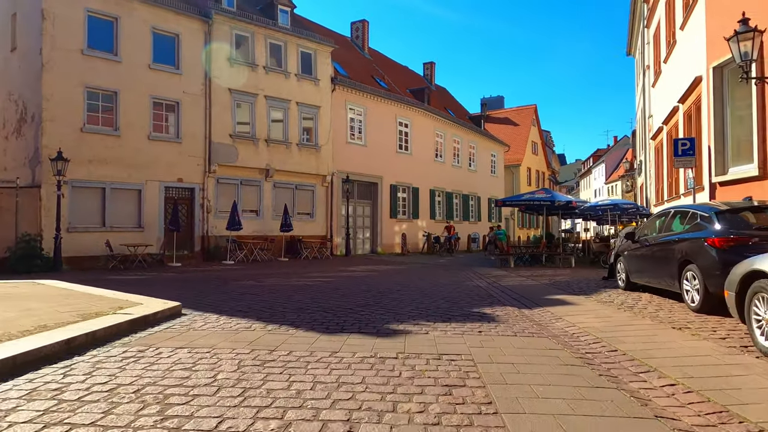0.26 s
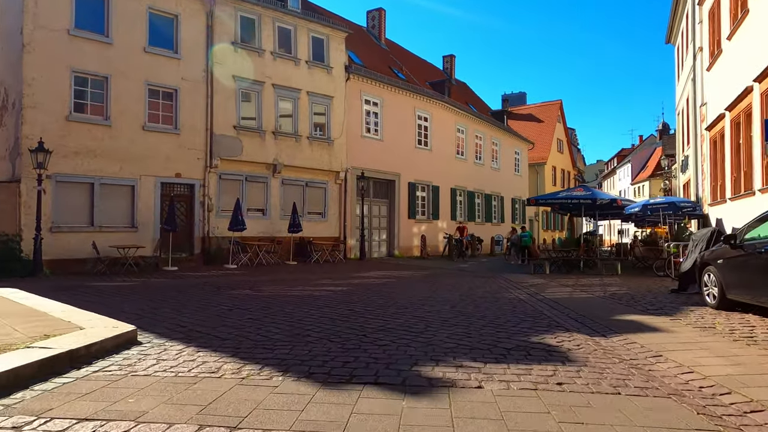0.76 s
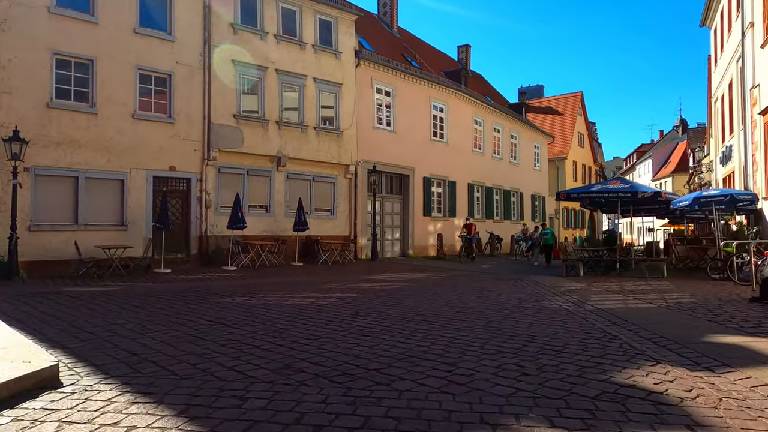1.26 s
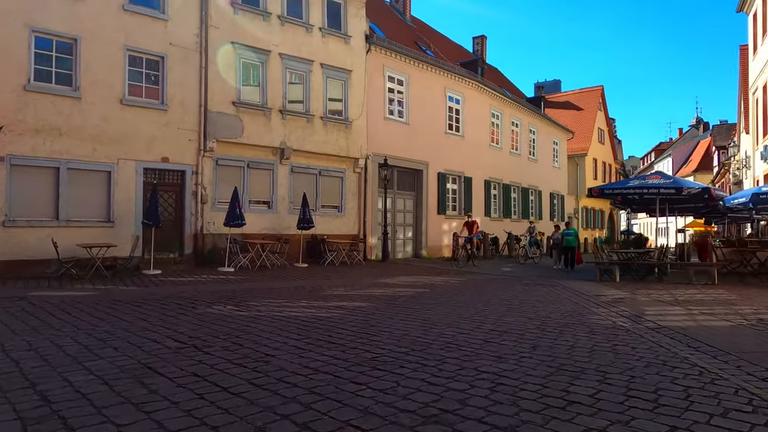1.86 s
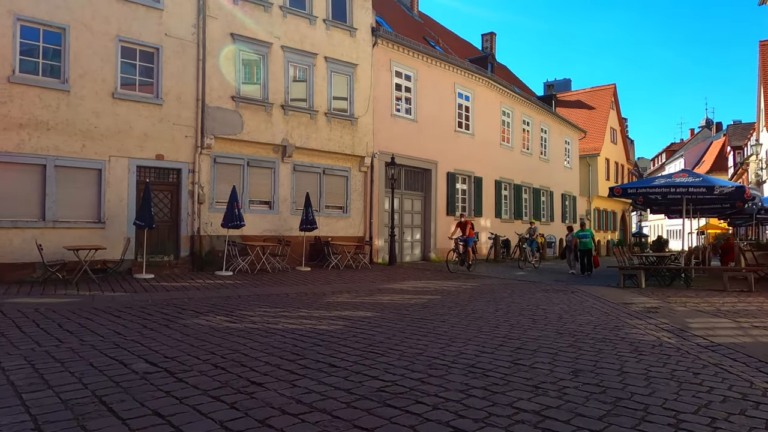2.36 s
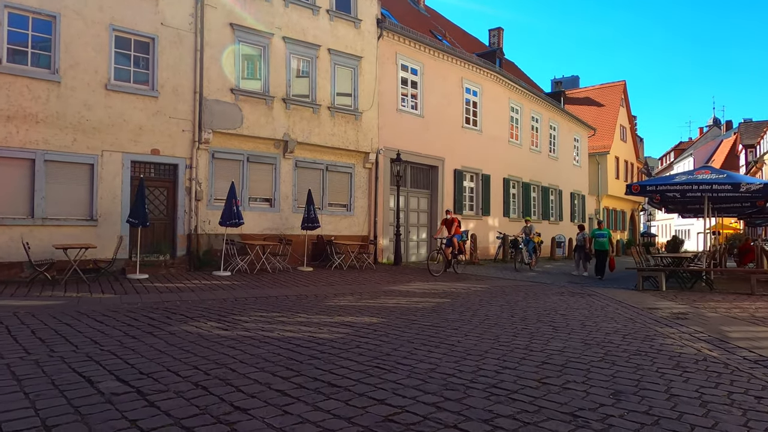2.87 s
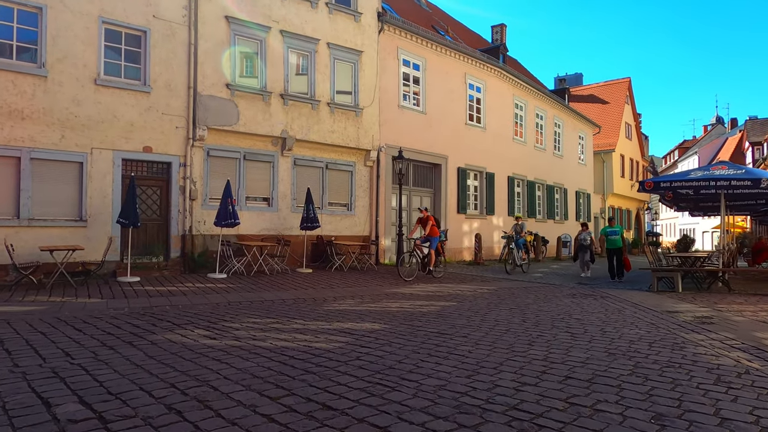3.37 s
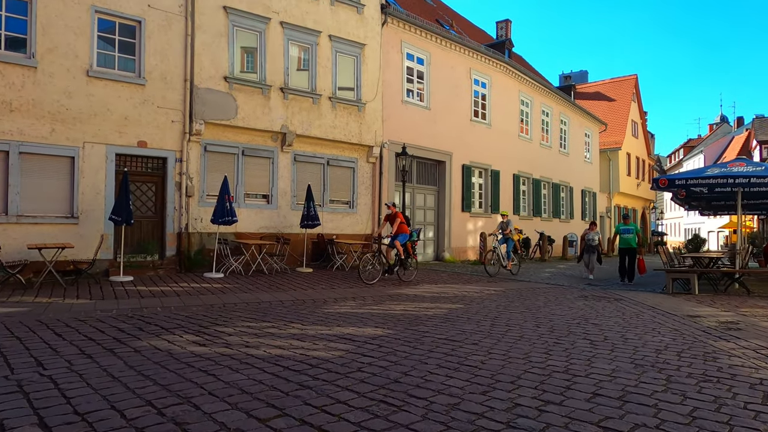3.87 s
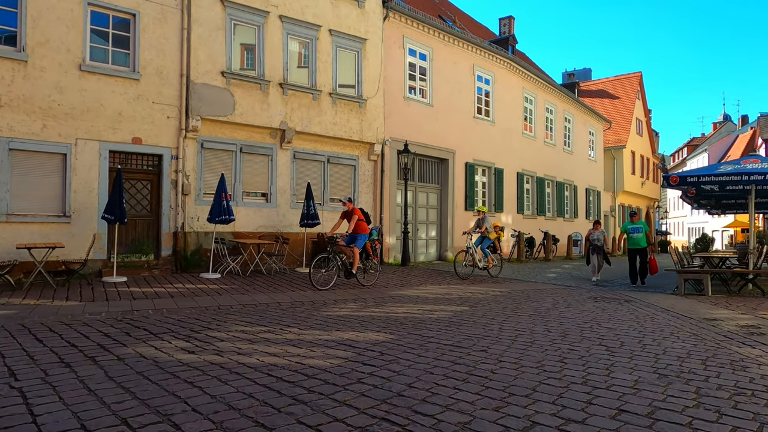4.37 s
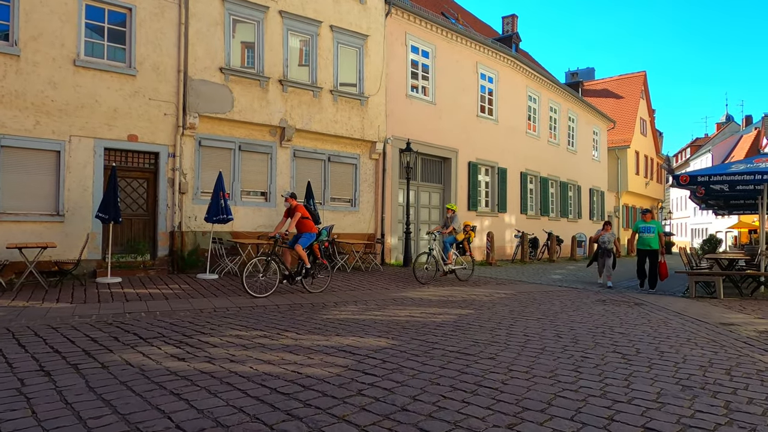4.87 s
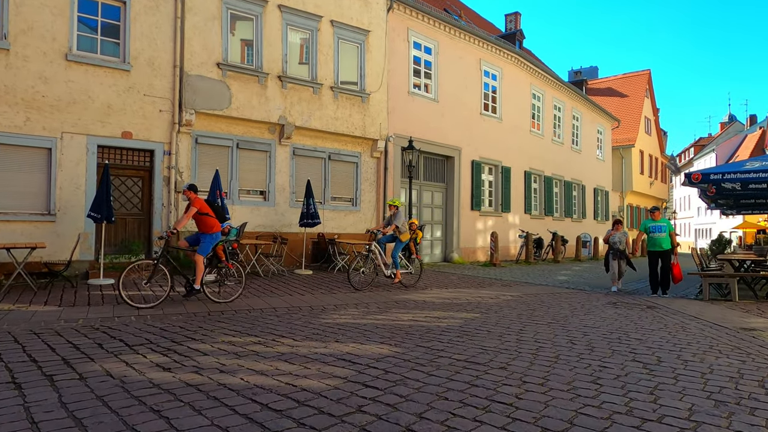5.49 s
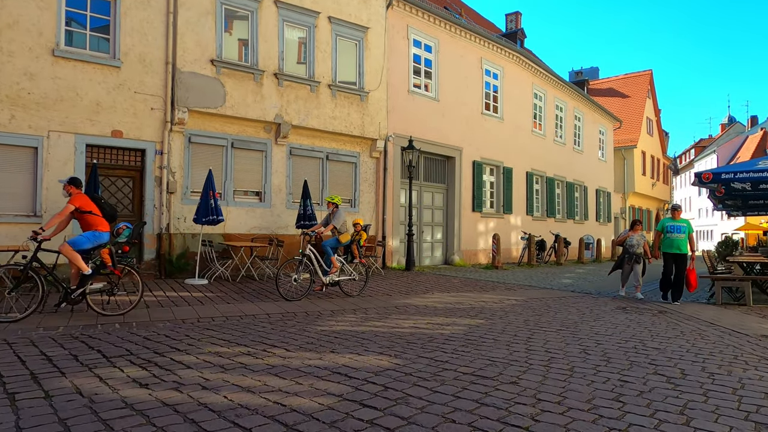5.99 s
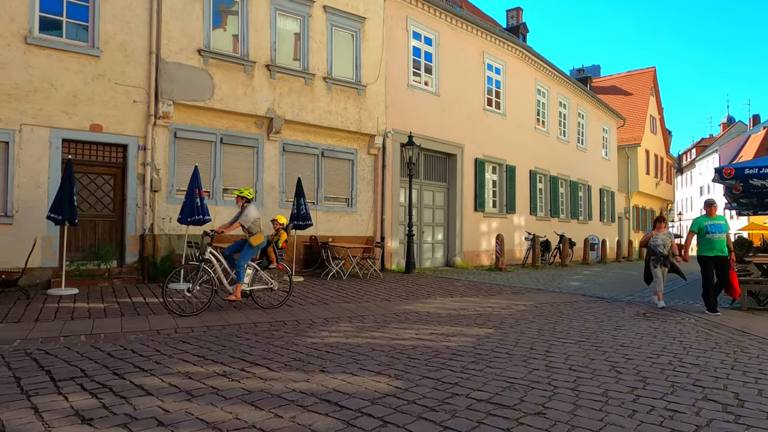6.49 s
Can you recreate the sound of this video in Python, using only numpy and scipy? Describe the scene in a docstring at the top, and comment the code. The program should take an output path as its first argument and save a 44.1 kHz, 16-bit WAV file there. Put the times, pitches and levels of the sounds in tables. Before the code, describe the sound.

A car rolls slowly over a cobbled square, heard through a microphone fixed to its body. A deep rumble with thumps comes first, over roaring tyres and a lightly clattering engine, while the brakes give a few thin squeals. The ride then gets quieter and a low hum wavers. Near the end, loose trim ticks and rattles, and the clutch bites in a loud, rising shudder with one sharp click.

```python
"""A car creeps over a cobbled square, heard through a microphone fixed to it. The stones shake its
body into a deep rumble with thumps, the tyres roar, and the idling engine clatters at each firing.
The brakes squeal thinly, a hum wavers midway, and loose trim ticks and rattles. Near the end the
clutch slips and bites in a rising shudder. The loudest peaks overload the microphone, which clicks."""
import sys
import numpy as np
from scipy import signal
from scipy.io import wavfile
from scipy.ndimage import uniform_filter1d

SR = 44100
rng = np.random.default_rng(int(sys.argv[2]) if len(sys.argv) > 2 else 0)


def wrap_up_sound(samples):
    """Save the sound to the file named by the first command line argument, as 16-bit audio."""
    columns = np.atleast_2d(samples).T
    # keep every value between -1 and 1, then stretch to whole-number steps
    tamed = np.clip(columns, -1, 1)
    steps = np.round(tamed * 32767).astype(np.int16)
    wavfile.write(sys.argv[1], SR, steps)


N = 297366


def gain_of(db):
    """Turns decibels into a number to multiply by."""
    return 10 ** (np.asarray(db) / 20)


def evened(x):
    """Scales a signal to an average (rms) level of 1."""
    return x / np.sqrt(np.mean(x ** 2) + 1e-20)


def smooth(x, span_s):
    """Takes a moving average twice."""
    size = round(span_s * SR)
    return uniform_filter1d(uniform_filter1d(x, size), size)


def wander(span_s):
    """A random curve that changes over about span_s seconds."""
    return evened(smooth(rng.standard_normal(N), span_s))


def curves(rows):
    """Joins a table's rows with straight lines: one curve for each column after the time."""
    times, *columns = np.transpose(rows)
    return [np.interp(np.arange(N) / SR, times, column) for column in columns]


def gate(start_s, end_s, fade_s=0.0155):
    """Fades from 0 to 1 after the start, and back to 0 by the end."""
    t = np.arange(N) / SR
    return np.clip(np.minimum(t - start_s, end_s - t) / fade_s, 0, 1)


def add(mix, start_s, sound):
    """Adds a sound to the mix at a given time."""
    part = mix[round(start_s * SR):][:len(sound)]
    part += sound[:len(part)]


def resonate(x, pitch_hz, *widths_hz):
    """Rings at a pitch: for each width, shifts that pitch down to zero, smooths, and shifts back."""
    turn = np.exp(2j * np.pi * np.cumsum(pitch_hz * np.ones(len(x))) / SR)
    for width_hz in widths_hz:
        decay = np.exp(-np.pi * width_hz / SR)
        x = 2 * (turn * signal.lfilter([1 - decay], [1, -decay], x / turn + 1e-18)).real
    return x


def ringing(rows):
    """One noise keeps several resonances ringing."""
    drive = rng.standard_normal(N)
    return sum(gain_of(db) * evened(resonate(drive, hz, width, width)) for hz, width, db in rows)


def noise(spectrum, size, patchy_db):
    """Noise with a given tone colour and drifting patches, built in frames of size samples."""
    frames, hz = 4 * N // size + 5, np.fft.rfftfreq(size, 1 / SR)
    real, imag, patches = rng.standard_normal((frames, len(hz), 3)).T
    patches = evened(uniform_filter1d(uniform_filter1d(patches, size=8, axis=0), size=6, axis=1))
    pitch_hz, level_db = np.transpose(spectrum)
    colour_db = np.interp(np.log(hz + 1), np.log(pitch_hz + 1), level_db, left=-120, right=-120)
    spectra = (real + 1j * imag) * gain_of(colour_db[:, None] + patchy_db * patches)
    return evened(signal.istft(spectra, nperseg=size, noverlap=3 * size // 4)[1][:N])


def steadied(x, share, span_s):
    """Takes out a share of the swells slower than span_s."""
    power = smooth(x ** 2, span_s)
    return evened(x / (abs(power) + 0.016) ** (share / 2))


# How hard the stones shake the car: time_s, rumble_db, floor_boom_db, tyre_drum_db
SHAKE_LEVELS = [(0.0, -8.5, -25, -25), (0.24, -12, -17.5, -27), (0.47, -12, -20, -19),
                (0.79, -14, -19.5, -24.5), (1.28, -15, -19.5, -22), (1.46, -17, -20, -20),
                (1.63, -20, -25, -25.5), (2.01, -16, -29.5, -26), (2.63, -27.5, -29.5, -27.5),
                (3.15, -24, -28, -28), (3.68, -24, -31.5, -27), (4.3, -30, -36, -28.5),
                (4.94, -29.5, -30, -28.5), (5.22, -25.5, -30.5, -28), (5.58, -25.5, -30.5, -27.5),
                (5.87, -18, -33, -22), (6.36, -28.5, -36.5, -26.5), (6.74, -15, -19.5, -27)]
# Tone colour of the rumble: pitch_hz, relative_db
RUMBLE_COLOUR = [(5.9, -33), (10, -9), (27, 0), (78, -5.5), (100, -37), (170, -120)]
# Runs of stones hold the floor on one note: start_s, length_s, first_pitch_hz, last_pitch_hz, level_db
FLOOR_NOTES = [(0.485, 0.12, 71.3, 83, -15.5), (0.896, 0.22, 86.4, 96.6, -12),
               (1.287, .35, 93, 90.7, -14.5)]
def body():
    """Stones shake the car's shell into a rumble, and its floor booms at a drifting pitch."""
    rumble_db, boom_db, _ = curves(SHAKE_LEVELS)
    t = np.arange(N) / SR
    boom_hz = 86.8 + 5.95 * wander(0.13)
    boom_gain = gain_of(boom_db)
    for start_s, length_s, first_hz, last_hz, level_db in FLOOR_NOTES:
        held = gate(start_s, start_s + length_s, fade_s=0.034)
        note_hz = first_hz + (last_hz - first_hz) * (t - start_s) / length_s
        boom_hz += held * (note_hz - boom_hz)
        boom_gain += held * (gain_of(level_db) - boom_gain)
    rumble = steadied(noise(RUMBLE_COLOUR, size=8192, patchy_db=-0.5), share=0.26, span_s=0.055)
    boom = evened(resonate(rng.standard_normal(N), boom_hz, 13.7, 25.0))
    return gain_of(rumble_db) * rumble + boom_gain * steadied(boom, share=0.6, span_s=0.2)


# Loudness of tyres and engine: time_s, roar_db, rush_db, clatter_db, hiss_db
DRIVING_LEVELS = [(0.0, -35, -37.5, -44.5, -71), (0.32, -29, -37.5, -40.5, -68.5),
                  (0.71, -26.5, -30, -39, -65.5), (1.11, -22.5, -30, -38, -62.5),
                  (1.57, -26, -33, -41, -65), (1.86, -25, -35.5, -43, -66), (2.23, -27.5, -37, -44.5, -68),
                  (3.75, -27, -36.5, -43.5, -67), (4.35, -25.5, -35.5, -44, -67),
                  (4.9, -27, -34.5, -42.5, -65), (5.2, -26, -36.5, -43.5, -66),
                  (5.54, -25.5, -34, -39.5, -63), (5.82, -26, -33, -40.5, -62.5),
                  (5.99, -24.5, -33.5, -39.5, -64.5), (6.21, -28.5, -39, -40, -65.5),
                  (6.42, -27, -34.5, -43, -66.5), (6.74, -26, -35.5, -43, -65)]
# Tone colours of the tyres' drumming, roar and rush: pitch_hz, relative_db
DRUM_COLOUR = [(65, -23.5), (110, -5.5), (140, -3), (162, -5), (210, -8.5), (300, -19), (390, -48),
               (660, -120)]
ROAR_COLOUR = [(140, -41.5), (230, -12.5), (345, -6), (426, -11), (494, -9.5), (646, -30), (771, -17),
               (900, -43.5), (1170, -50), (1980, -120)]
RUSH_COLOUR = [(320, -16), (550, 4.5), (603, 5.5), (652, 2.5), (779, -0.5), (910, -0.5), (1490, -5.5),
               (1860, -13.5), (3000, -24.5), (3900, -39), (6600, -120)]
# Hollows in the body that ring with the roar: pitch_hz, width_hz, relative_db
BODY_HOLLOWS = [(351.8, 36, -6), (492, 30, -14), (795, 88, -19.5), (270.2, 22, -10.5), (606, 16, -16)]
def tyres():
    """Rubber on stone: low drumming, a roar that rings the body's hollows, a brighter tread rush."""
    _, _, drum_db = curves(SHAKE_LEVELS)
    roar_db, rush_db, _, _ = curves(DRIVING_LEVELS)
    roar = evened(ringing(BODY_HOLLOWS) + noise(ROAR_COLOUR, size=2048, patchy_db=0.03))
    roar = steadied(roar, share=0.15, span_s=0.019)
    drum = steadied(noise(DRUM_COLOUR, size=2048, patchy_db=0.5), share=0.077, span_s=0.032)
    rush = noise(RUSH_COLOUR, size=1024, patchy_db=1.0)
    return gain_of(drum_db) * drum + gain_of(roar_db) * roar + gain_of(rush_db) * rush


# How fast the engine fires: time_s, firings_per_s
FIRING_RATE = [(0.0, 28.9), (1.97, 30), (5.24, 26.0), (5.7, 38), (6.74, 39)]
# Tone colours of the engine's clatter and hiss: pitch_hz, relative_db
CLATTER_COLOUR = [(760, -16), (1300, -7), (1570, -36.5), (1650, 1), (1810, -6), (2020, -3.5), (2390, -7.5),
                  (3550, -9), (3630, -10.5), (3880, -11), (4720, -21.5), (5160, -21), (5690, -26),
                  (7800, -34.5), (10100, -69), (17200, -120)]
HISS_COLOUR = [(3820, -42), (6500, -4.5), (7710, -16.5), (8540, 4.5), (9050, 2), (9800, -5), (13100, -20.5),
               (13900, -33), (15500, -41.5)]
# Engine parts that ring with the clatter: pitch_hz, width_hz, relative_db
ENGINE_PARTS = [(2006, 60, -20.5), (2620, 76, -30), (3120, 60, -20.5), (3384, 54, -24), (3660, 50, -23.5),
                (4120, 93, -27.5), (5080, 90, -32.5), (5300, 120, -36.5), (6200, 200, -32.5)]
def engine():
    """Each firing makes a burst of clatter of its own strength; a high hiss pulses gently with it."""
    _, _, clatter_db, hiss_db = curves(DRIVING_LEVELS)
    firings = np.cumsum(curves(FIRING_RATE)[0]) / SR
    strength = gain_of(1.5 * rng.standard_normal(400))[firings.astype(int)]
    burst = uniform_filter1d(strength * np.exp(-(firings % 1) / 0.39), size=90)
    whine = (3753, 16, -21)  # one more, narrow ring: pitch_hz, width_hz, relative_db
    clatter = ringing(ENGINE_PARTS + [whine]) + noise(CLATTER_COLOUR, size=512, patchy_db=0.4)
    clatter = evened((1 + 0.62 * burst) * clatter)
    hiss = evened((1 + 0.19 * burst) * noise(HISS_COLOUR, size=256, patchy_db=1.5))
    return gain_of(clatter_db) * clatter + gain_of(hiss_db) * hiss


# Soft low rings: start_s, level_db, pitch_hz, ring_s (time to fade by 60 dB)
LOW_THUMPS = [(0.101, -20, 41, 0.15), (0.249, -4, 26, 0.3), (0.418, -6.5, 96.5, 0.39),
              (0.593, 8, 75.4, 0.048), (0.916, -27, 88, 0.55), (0.97, -16, 45, 0.21),
              (1.119, -6, 32.2, 0.19), (1.31, -10, 33, 0.2), (1.45, -1.5, 53.8, 0.21),
              (1.57, -5, 34.4, 0.32), (1.8, -8, 27.7, 1), (1.882, -3.5, 96, 0.21), (2.151, -12, 32, 0.22),
              (2.251, -12, 38.8, 0.36), (2.45, -9, 29.8, 0.29), (3.307, -11, 38, 0.17),
              (4.27, -20.5, 343, 0.5), (4.48, -20.5, 277, 0.36), (4.935, -17.5, 341, 0.33),
              (4.997, -10, 105, 0.14), (5.06, -20.5, 358, 0.5), (5.072, -5.5, 103, 0.14),
              (5.25, -20.5, 359.5, 0.3), (5.33, -24.5, 339, 0.4), (5.628, -2.5, 50.7, 0.27),
              (5.854, -2, 56, 0.051), (5.924, -6, 78.4, 0.35), (6.359, -9.5, 61.1, 0.16),
              (6.428, -6.5, 46.2, 0.32), (6.547, -0.5, 38, 0.089), (6.7, 1, 37, 0.064)]
def thumps():
    """Stones ring the shell and its hollows; the ring at 5.924 s is an overtone of the clutch's shudder."""
    out, t = np.zeros(N), np.arange(SR // 4) / SR
    fade_in = 1 - np.exp(-t / 0.0035)
    fade_out = np.minimum((t[-1] - t) / .02, 1)
    for start_s, level_db, pitch_hz, ring_s in LOW_THUMPS:
        ring = gain_of(level_db - 60 * t / ring_s) * np.sin(2 * np.pi * pitch_hz * t)
        add(out, start_s, fade_in * ring * fade_out)
    return out


# Brake squeals: start_s, rise_s, hold_s, level_db, sag_db, pitch_hz, climb_hz_per_s, tremble_hz
BRAKE_SQUEALS = [(.54, .065, .07, -43.5, -2, 6805, 100, 50), (.72, .05, .17, -58, -11, 6865, 50, 60),
                 (1.15, .1, .05, -68, -6, 6870, 350, 60), (1.68, .11, .04, -71, -6, 6850, 500, 60),
                 (1.83, .045, .15, -57, -12, 7640, 0, 80), (2.08, .038, .26, -48.5, -10, 7465, 230, 30)]
def brakes():
    """Pads grab and slip in a thin, trembling whistle, and the house fronts throw it back."""
    onset_db, release_db_per_s, tremble_s = -28, -700, 0.00363
    echo_db, echo_s = -8, .75
    out = np.zeros(N)
    for start_s, rise_s, hold_s, level_db, sag_db, pitch_hz, climb, tremble_hz in BRAKE_SQUEALS:
        t = np.arange(N) / SR - start_s
        shape_db = np.interp(t, [0, rise_s, rise_s + hold_s], [onset_db, 0, sag_db])
        shape_db += release_db_per_s * np.maximum(t - rise_s - hold_s, 0)
        hz = pitch_hz + climb * np.clip(t, 0, 1) + tremble_hz * np.tanh(wander(tremble_s))
        phase = 2 * np.pi * np.cumsum(hz) / SR
        whistle = np.sqrt(2) * (np.sin(phase) + gain_of(-48.5) * np.sin(2 * phase))
        flutter_db = 4 * wander(tremble_s)
        out += gain_of(level_db + shape_db + flutter_db) * (t > 0) * whistle
    tail = gain_of(-60 * np.arange(SR) / SR / echo_s) * rng.standard_normal(SR)
    echo = signal.fftconvolve(out, tail / np.linalg.norm(tail))[:N]
    return out + gain_of(echo_db) * echo


# Clicks of the overloaded microphone: start_s, level_db
OVERLOAD_CLICKS = [(0.6075, -43), (5.9593, -20)]
def overload_clicks():
    """The overloaded microphone gives a sharp click, placed by hand at two loud peaks."""
    out = np.zeros(N)
    for start_s, level_db in OVERLOAD_CLICKS:
        add(out, start_s, gain_of(level_db) * np.array([1, .55]))  # the second sample softens the treble
    return out


def engine_hum():
    """For a while the engine hums, wavering in pitch and loudness."""
    pitch_hz = 199.4 + 1.5 * wander(0.048)
    level_db = -31 + 2.5 * wander(0.031)
    tone = np.sqrt(2) * np.sin(2 * np.pi * np.cumsum(pitch_hz) / SR)
    return gain_of(level_db) * gate(start_s=1.9, end_s=4.66) * tone


# Single ticks of trim and linkage: start_s, level_db, brightness_db_per_octave
TRIM_TICKS = [(3.466, -56, 14), (3.472, -57, 14), (4.1475, -49, 5), (4.196, -53, 10), (4.7945, -50, 5),
              (5.3562, -27, 0), (5.5827, -34, -10), (5.6166, -32.5, -6), (5.634, -35, -8),
              (5.673, -31, -2.5), (5.704, -32, -1.5), (5.709, -33, -1), (5.7508, -34, -3), (5.788, -39, -1),
              (6.5954, -44, 2), (6.678, -45, 3)]
# The notes that ring in every tick: pitch_hz, relative_db, ring_s (time to fade by 60 dB)
TRIM_NOTES = [(800, -11, .018), (1100, -7, .018), (1400, -5, .018), (1680, -6, .014), (1960, -3, .022),
              (2350, -3, .022), (2650, -6, .01), (2950, -2, .011), (3300, -5, .008), (3650, -5, .008),
              (4050, -5, .008), (4450, -5, .008), (4850, -7, .008), (5900, -20, .008)]
def ticks():
    """Loose trim ticks and rings briefly; the linkage rattles as it takes up its slack."""
    rattle_count, rattle_from_s, rattle_to_s = 90, 5.57, 5.8
    middle_hz, detune, uneven_db, rise_cycles = 2000, .025, 1.2, 1.5
    chatter_db, chatter_s = -20, .06
    rattle = [(rattle_from_s + (rattle_to_s - rattle_from_s) * when, -47 + 8 * strength, -6)
              for when, strength in rng.random((rattle_count, 2))]  # same columns as TRIM_TICKS
    note_hz, note_db, ring_s = np.transpose(TRIM_NOTES)[:, :, None]
    out, t = np.zeros(N), np.arange(SR // 10) / SR
    fade_in = 1 - np.exp(-t * note_hz / rise_cycles)
    hits = TRIM_TICKS + rattle
    chances = rng.standard_normal((len(hits), 3, len(TRIM_NOTES), 1))
    for (start_s, level_db, brightness), (mistune, uneven, phase) in zip(hits, chances):
        start_db = level_db + note_db + brightness * np.log2(note_hz / middle_hz) + uneven_db * uneven
        tones = np.sin(2 * np.pi * (note_hz * (1 + detune * mistune) * t + phase))
        ring = (gain_of(start_db - 60 * t / ring_s) * fade_in * tones).sum(axis=0)
        chatter = gain_of(chatter_db - 60 * t / chatter_s) * rng.standard_normal(len(t))
        add(out, start_s, signal.fftconvolve(ring, (t == 0) + chatter))  # one clean hit, then chatter
    return out


# The clutch's judder: time_s, slips_per_s, shudder_db, ring_db
CLUTCH_SLIPS = [(5.845, 31, -39, -23), (5.872, 28.3, -30, -16), (5.9, 30.4, -27, -27),
                (5.925, 32, -9, -15.5), (6.01, 43, -8, -17), (6.058, 56, -9.5, -14.5),
                (6.118, 59, -8.5, -15.5), (6.14, 49, -9, -21.5), (6.165, 57, -22, -29),
                (6.194, 59, -20.5, -43), (6.31, 64, -21, -54), (6.49, 56, -31, -35)]
# How the rubber mountings ring: pitch_hz, width_hz, relative_db
MOUNTING_NOTES = [(349, 19, 7.5), (371.4, 18.5, 11.5), (395.7, 17, 9), (208, 47, -4)]
def clutch():
    """The clutch slips and bites in a low shudder, and each bite knocks the mountings."""
    slips_per_s, shudder_db, ring_db = curves(CLUTCH_SLIPS)
    slipping = gate(CLUTCH_SLIPS[0][0], CLUTCH_SLIPS[-1][0])
    slips = np.cumsum(slips_per_s * slipping) / SR + 0.224
    shudder = np.sqrt(2) * (np.sin(2 * np.pi * slips) + 0.067 * np.sin(4 * np.pi * slips + 1.0))
    knocks = 160 * np.diff(np.floor(slips), prepend=0)
    scrapes = np.exp(-(slips % 1) / .3) * rng.standard_normal(N)
    rubber = signal.butter(4, 600, fs=SR, output="sos")  # softens everything above 600 Hz
    bites = signal.sosfilt(rubber, knocks + scrapes)
    ring = sum(gain_of(db) * resonate(bites, hz, width, 2 * width, 2 * width)
               for hz, width, db in MOUNTING_NOTES)
    ring = steadied(evened(ring), share=1.0, span_s=0.02)
    return slipping * (gain_of(shudder_db) * shudder + gain_of(ring_db) * ring)


def scene():
    """Mixes the car's sounds into one channel; uneven stones make tyres and engine swell together."""
    swell = gain_of(0.5 * wander(0.15))
    rolling = body() + swell * (tyres() + engine() + engine_hum())
    return (rolling + brakes() + clutch() + thumps() + overload_clicks() + ticks())[None]


def record(dry):
    """The overloaded microphone rounds off the loudest peaks; then the highest treble is cut."""
    knee, cutoff_hz = .8, 15700
    excess = np.maximum(abs(dry) - knee, 0)
    rounded = np.sign(dry) * (abs(dry) - excess + (1 - knee) * np.tanh(excess / (1 - knee)))
    lowpass = signal.firwin(511, cutoff_hz, window=("kaiser", 9), fs=SR)
    padded = np.pad(rounded, [(0, 0), (255, 255)], "reflect")
    return signal.oaconvolve(padded, lowpass[None], "valid")


dry = scene()
out = record(dry)
wrap_up_sound(out)
```